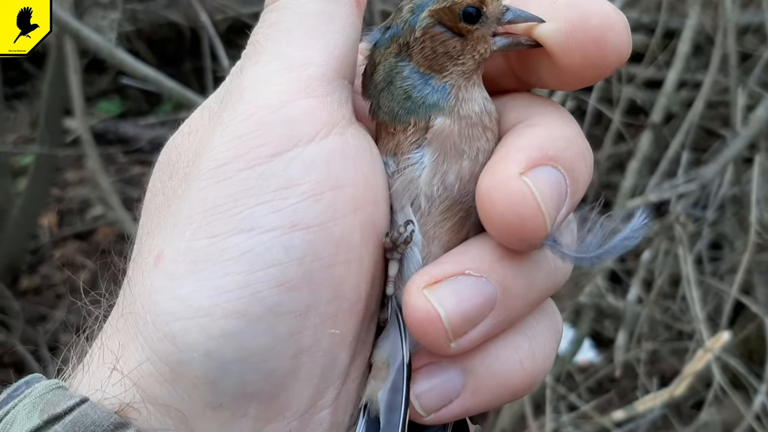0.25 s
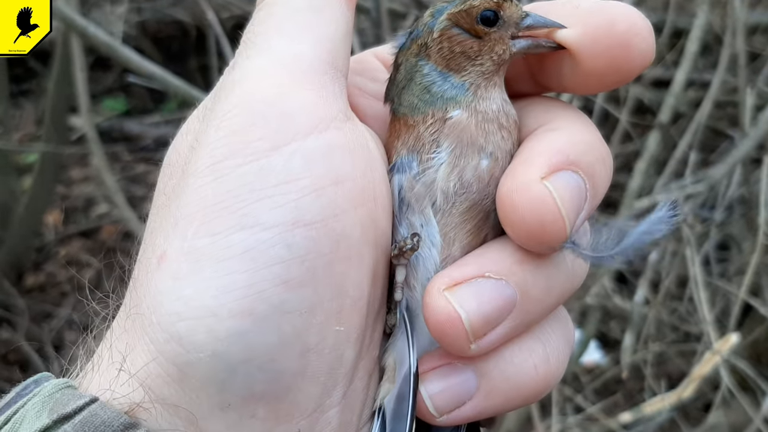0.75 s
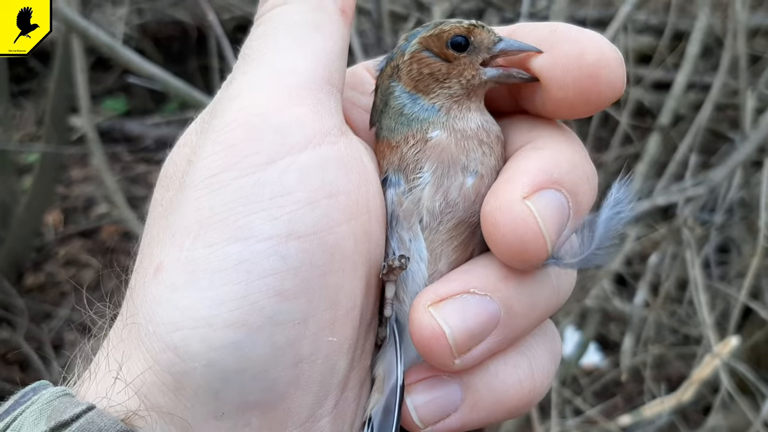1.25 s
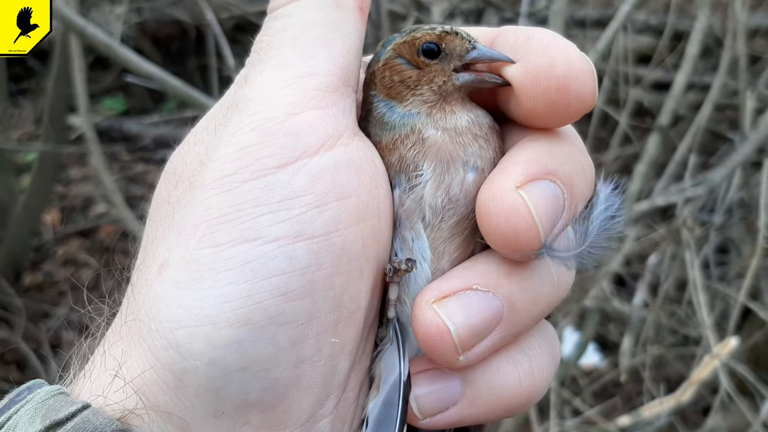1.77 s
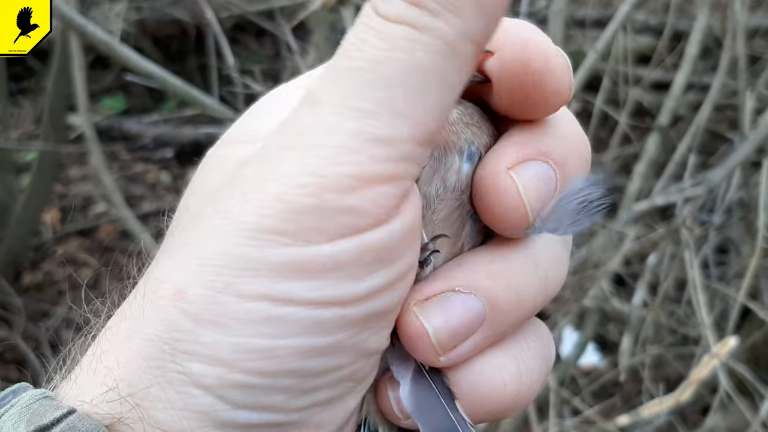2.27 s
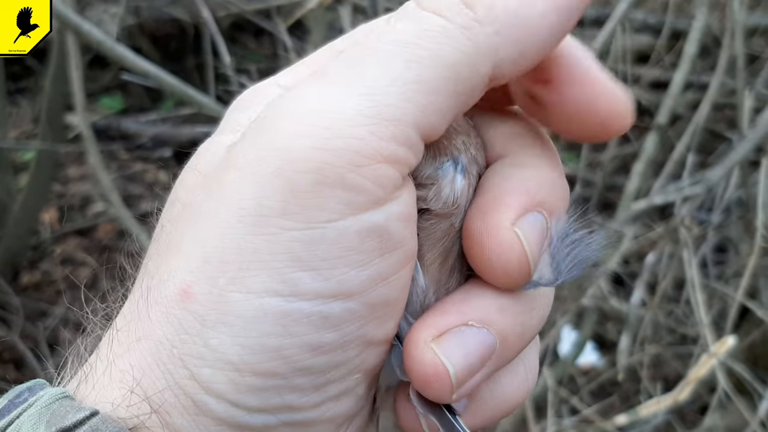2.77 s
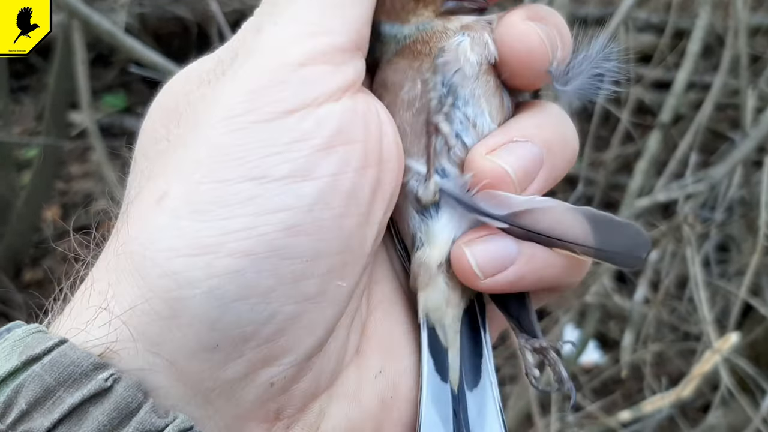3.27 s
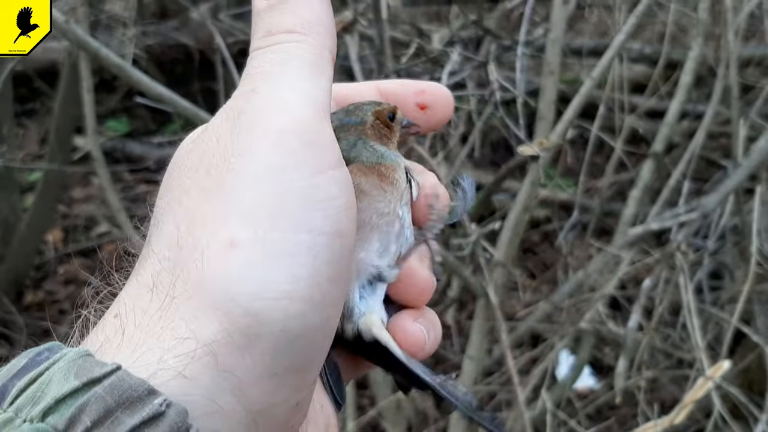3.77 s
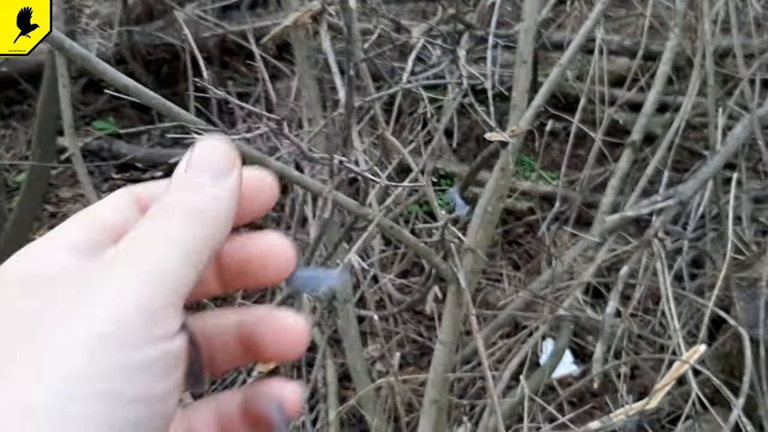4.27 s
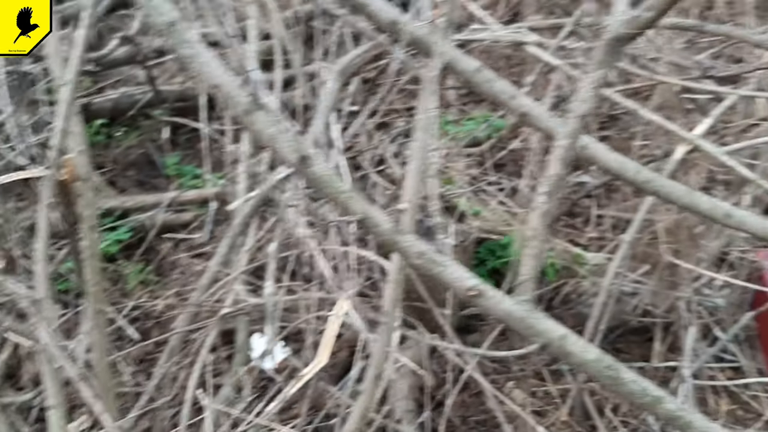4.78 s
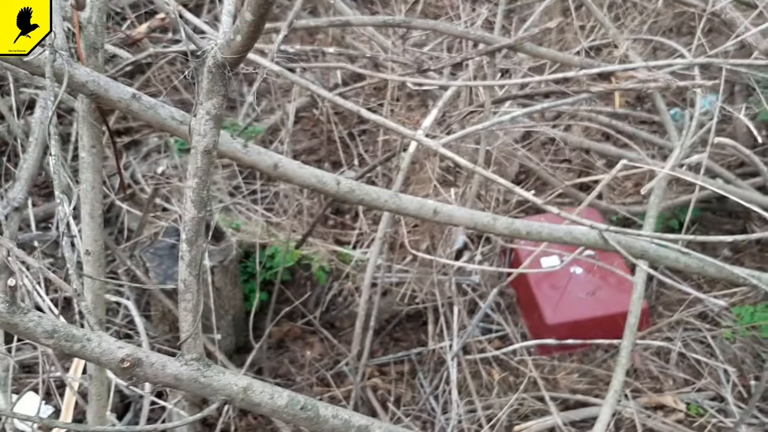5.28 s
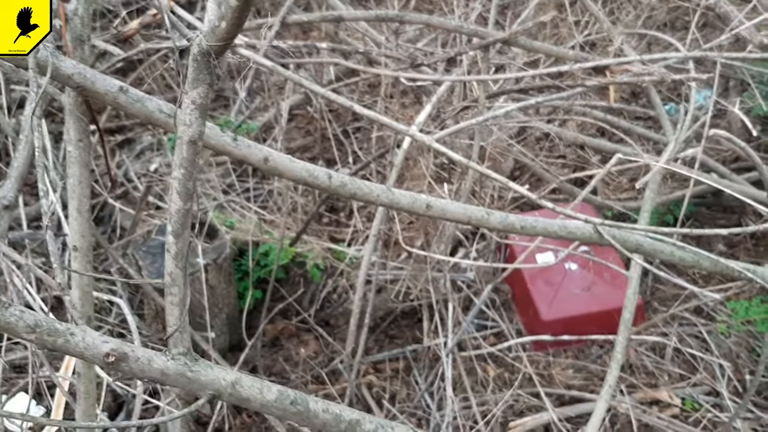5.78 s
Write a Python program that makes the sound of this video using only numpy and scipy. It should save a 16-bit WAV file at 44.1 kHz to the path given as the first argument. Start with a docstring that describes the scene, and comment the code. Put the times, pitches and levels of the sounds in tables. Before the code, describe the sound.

A quiet outdoor place among shrubs, with low rumble, a soft distant wash and faint hiss. Two tiny rasps open the scene, then from 0.6 to 1.2 s a songbird gives an even run of soft rising pips. Sparse thin slurs follow on the left, gathering near 2.0 to 2.3 s with a high falling whistle; very faint low hoots sit far behind. A short rasp comes at 2.5 s, then scattered chirps until 3.8 s. At 3.9 s feathers brush skin and a finch bursts away: a rapid soft flutter with papery snaps and low air puffs, strongest around 4.03 s, moving right and thinning by 4.4 s. Weak wingbeats linger; a dry twig click lands near 5.0 s. The song is now louder and more central: a clear arching whistle from 5.0 to 5.4 s, then quick chirps and buzzy rasps until about 5.8 s, before background air closes it.

```python
"""Finch let go among shrubs

A finch leaves a hand: noise for feathers on fingers, snaps and low air swings for wings whirring off to the right,
click-and-knock pulses for a wing tip, then twigs. A starling-like songbird warbles all along: gliding near-pure
tones for slurs and whistles, trains of tiny chirps for rasps, scattered by stems. Faint hoots are sines; rumble,
wash and hiss are coloured noise. A phone with two microphone ports, close to the hand, turns after the finch."""
import sys
import numpy as np
from scipy import signal
from scipy.fft import rfft, irfft, next_fast_len
from scipy.io import wavfile
from scipy.ndimage import uniform_filter1d, map_coordinates

SR = 44100
rng = np.random.default_rng(int(sys.argv[2]) if len(sys.argv) > 2 else 0)


def file_out(sig):
    """Save sig as 16-bit WAV at sys.argv[1]."""
    # one column per channel
    cols = np.atleast_2d(sig).T
    # limit, then scale
    lim = np.clip(cols, -1, 1)
    pcm = np.round(lim * 32767).astype(np.int16)
    wavfile.write(sys.argv[1], SR, pcm)


N = 265967
TIME = np.arange(N) / SR

# Table levels are mix levels ahead of each layer's trim; spectra give relative levels.
# wing strokes: t/s, level/dB
WING_STROKES = [(3.939, -36), (3.965, -38), (3.985, -39), (4.015, -33), (4.028, -23), (4.071, -29),
                (4.112, -34.5), (4.16, -41.5), (4.197, -30), (4.294, -34), (4.343, -32.5), (4.391, -33.5),
                (4.613, -35.5), (4.657, -38), (4.731, -35), (4.753, -37), (4.787, -39), (4.944, -38),
                (5.757, -36.5)]
# the finch's way: t/s, left over right level/dB, feather snap over push level/dB
FINCH_PATH = [(3.95, 6, -6.5), (4.1, -0.5, -11.5), (4.3, -24, -12.5), (4.75, -28.5, -28),
              (4.97, -34.5, -19.5), (5.76, -15.5, -6)]
# colour of the feather snap: f/Hz, level/dB
SNAP_COLOUR = [(60, -14.5), (250, 3.5), (600, -3.5), (1200, -14), (2500, -33), (6000, -28), (15000, -42.5)]
# colour of the wing swish: f/Hz, level/dB
SWISH_COLOUR = [(100, -11), (500, -5), (1000, 1), (1700, -2.5), (2500, -14), (6000, -19.5), (15000, -37)]
# wing tips slipping between fingers: t/s, half length/s, level/dB
WING_TIP_SLIPS = [(3.941, 0.0057, -35), (4.016, 0.0029, -47.5), (4.069, 0.0025, -40)]
# colour of feathers on skin: f/Hz, level/dB
FEATHER_COLOUR = [(300, 0), (1500, 4), (2500, 0), (4500, 8.5), (7500, 5), (11000, 4.5), (15500, -5)]
# feathers on skin swell, hold while the bird pushes out, and fade
BRUSH_FROM_S, BRUSH_TO_S, BRUSH_RISE_DB_PER_S, BRUSH_FALL_DB_PER_S = 3.917, 4.033, 200, 92
# dry ticks along its way, a wing tip click, then twigs: t/s, click level/dB, knock level/dB
DRY_TICKS = [(3.915, -31.5, -52), (4.731, -36, -42.5), (4.961, -55.5, -30), (4.9665, -48, -21.5),
             (4.98, -32.5, -28.5), (4.99, -23.5, -37.5), (5.022, -38, -57.5), (5.12, -39.5, -43.5)]
# colour of the sharp click: f/Hz, level/dB
CLICK_COLOUR = [(200, 18), (1500, 9.5), (4000, 7.5), (7500, -10), (15000, -9)]
# colour of the dull knock: f/Hz, level/dB
KNOCK_COLOUR = [(40, -18), (120, 1.5), (500, 3), (900, -6), (2000, -15.5), (6000, -45)]

# clear notes of the song: t/s, length/s ahead of soft edges, start f/Hz, end f/Hz, level/dB
CLEAR_NOTES = [(0.99, 0.02, 5960, 7600, -61.5), (1.183, 0.019, 5750, 7700, -60),
               (1.415, 0.032, 5940, 7700, -65.5), (1.464, .038, 3180, 4430, -52.5),
               (1.574, 0.029, 2850, 3486, -55), (1.696, .044, 4350, 5140, -64.5),
               (1.812, .024, 2700, 3074, -56.5), (1.922, 0.036, 2830, 4700, -58),
               (2.017, 0.034, 2780, 3480, -52.5), (2.079, 0.029, 3240, 4560, -43),
               (2.125, 0.019, 3250, 3380, -48.5), (2.171, .067, 2370, 3230, -55.5),
               (2.173, 0.042, 5600, 7000, -58), (2.205, 0.049, 3900, 4340, -43.5),
               (2.264, 0.034, 3110, 4400, -48.5), (2.306, 0.017, 4940, 4140, -46),
               (2.311, 0.038, 3320, 2310, -57), (2.565, .031, 3380, 3040, -51),
               (2.661, 0.019, 3070, 3630, -49), (2.797, 0.061, 4020, 4590, -59.5),
               (2.816, 0.1, 5400, 7470, -66), (2.853, 0.055, 3800, 4850, -51.5),
               (2.86, 0.038, 3240, 3800, -55), (2.861, 0.072, 1980, 2520, -65.5),
               (2.932, 0.023, 2610, 2780, -55), (3.011, 0.0097, 2940, 4650, -49.5),
               (3.038, 0.092, 5380, 5650, -64.5), (3.051, 0.041, 3124, 3290, -48),
               (3.115, 0.039, 7450, 6730, -56), (3.34, 0.022, 6050, 7660, -56.5),
               (3.366, 0.013, 5080, 3270, -49.5), (3.386, 0.015, 3790, 4590, -54),
               (3.421, 0.049, 5600, 5690, -58.5), (3.495, 0.037, 5240, 5350, -58.5),
               (3.518, 0.032, 3050, 3374, -47), (3.555, 0.024, 3700, 4520, -53.5),
               (3.644, 0.05, 3400, 3400, -54), (3.669, 0.051, 6700, 5310, -55.5),
               (3.718, 0.051, 3300, 2650, -49.5), (3.739, 0.0071, 3200, 4380, -40.5),
               (3.78, 0.015, 3770, 4580, -52), (3.805, 0.045, 6000, 5260, -51.5),
               (4.405, 0.028, 2980, 3380, -54.5), (4.507, .045, 3620, 4600, -42.5),
               (4.552, 0.019, 5700, 6720, -48.5), (4.669, 0.024, 6520, 5560, -51.5),
               (4.783, 0.037, 5020, 4430, -45), (4.923, 0.023, 3100, 3420, -53),
               (5.01, 0.028, 3340, 4350, -40.5), (5.062, .033, 5950, 5460, -55.5),
               (5.084, 0.027, 3560, 4320, -37.5), (5.124, 0.027, 5900, 6500, -47.5),
               (5.236, .033, 6940, 6550, -49.5), (5.374, .026, 5170, 4750, -48.5),
               (5.39, 0.056, 3635, 4320, -39), (5.458, 0.034, 3940, 3350, -43),
               (5.462, 0.029, 3950, 4120, -41), (5.507, 0.053, 2400, 2780, -48),
               (5.571, .03, 2980, 2400, -50), (5.657, 0.036, 3350, 2664, -41),
               (5.713, 0.048, 3430, 4300, -36.5), (5.729, 0.062, 3800, 4350, -38)]
# a slur moves fast at first, then levels off; the crest is its loudest point as a share of the note
NOTE_BOW, NOTE_CREST = .7, 0.38
# the song opens with an even run of soft rising pips; pitches and level are centres for chance spread
PIP_START_S, PIP_GAP_S, PIP_S, PIP_FROM_HZ, PIP_TO_HZ, PIP_DB = .62, .1035, .03, 2790, 3150, -58.5
# a pip ends in an upward flick: its length, pitch ratio and typical level relative to the pip
PIP_FLICK_S, PIP_FLICK_RISE, PIP_FLICK_DB = 0.016, 1.11, -8.5
# falling whistle, two point lists: pitch as t/s, f/Hz; level as t/s, level/dB
FALLING_WHISTLE = [(2.015, 7494), (2.033, 6696), (2.047, 6420), (2.165, 5195), (2.169, 5014),
                   (2.215, 4411)], [(2.012, -67), (2.022, -52), (2.032, -53.5), (2.134, -52.5),
                   (2.142, -55.5), (2.204, -48.5), (2.22, -58)]
# whistle leading into the long one, two point lists: pitch as t/s, f/Hz; level as t/s, level/dB
LEAD_IN_WHISTLE = [(4.74, 2250), (4.864, 2307), (4.906, 2260), (4.914, 2185), (4.925, 2100)], [(4.74, -65),
                   (4.848, -50), (4.88, -48), (4.9, -65.5), (4.922, -48), (4.935, -64.5)]
# long arching whistle, two point lists: pitch as t/s, f/Hz; level as t/s, level/dB
ARCHING_WHISTLE = [(4.998, 2410), (5.014, 2437), (5.078, 2654), (5.162, 2677), (5.25, 2545), (5.312, 2420),
                   (5.35, 2385), (5.378, 2307), (5.41, 2298)], [(4.985, -51.5), (5.003, -42.5),
                   (5.031, -34), (5.065, -34.5), (5.077, -51), (5.091, -35.5), (5.181, -34), (5.201, -48.5),
                   (5.219, -32), (5.293, -23), (5.311, -30), (5.357, -25.5), (5.373, -35.5), (5.401, -28),
                   (5.418, -56)]
# buzzy calls: t/s, length/s, pulse rate/(1/s), centre f/Hz, pitch scatter/share, level/dB
RASP_CALLS = [(.008, 0.039, 128, 2340, 0.17, -53.5), (.082, 0.074, 100, 2300, 0.13, -53.5),
              (2.521, 0.1, 920, 3770, 0.2, -56), (3.683, 0.032, 530, 5660, 0.05, -52),
              (5.43, 0.073, 600, 3990, 0.042, -42.5), (5.509, 0.068, 230, 2520, 0.096, -48.5),
              (5.642, .02, 1300, 3790, 0.22, -41.5), (5.669, 0.062, 206, 2700, 0.15, -46.5),
              (5.772, 0.059, 330, 3080, 0.23, -49)]
# sinking of the pitch over a rasp, as a log ratio; relative rise within each pulse
RASP_SAG, RASP_CHIRP_PER_S = 0.11, 35
# spans of soft slurs under the clear notes: start t/s, end t/s, slur rate/(1/s), level/dB
UNDERSONG_SPANS = [(2.027, 2.3, 41, -56), (3.496, 3.836, 60, -61), (5.02, 5.4, 40, -51.5),
                   (5.422, 5.8, 47, -58)]
# the song passes from left to right as the phone turns: t/s, left over right level/dB
SONG_PATH = [(0, 6.5), (.8, 15.5), (2.2, 7.5), (3.7, 13), (4.5, 5.5), (5, -2.5), (5.8, -5)]
PORT_LAG_S = 0.000496  # the song reaches the left port this much sooner

# faint far-off hoots: t/s, centre f/Hz
HOOT_CALLS = [(0.451, 360), (.46, 620), (1.17, 354.3), (1.93, 360.5), (2.57, 626)]
# low background: t/s, rumble level/dB, distant wash level/dB
AIR_LEVELS = [(0, -54, -59), (.55, -50, -58), (1.4, -52.5, -61.5), (2.1, -49.5, -58.5), (2.5, -54, -61),
              (3.9, -54, -59.5), (4.02, -44, -46), (4.1, -37.5, -49.5), (4.26, -50.5, -55), (4.6, -56, -56),
              (5.1, -51, -56), (6.03, -52.5, -56.5)]
# hisses: t/s, hiss level/dB, high hiss level/dB
HISS_LEVELS = [(0, -64, -76.5), (.55, -68, -83.5), (.75, -79.5, -79), (2.4, -78, -78), (2.6, -71, -73),
               (3.8, -65, -79.5), (4, -48, -74.5), (4.28, -68, -69.5), (4.39, -60.5, -60.5),
               (4.62, -56.5, -69), (4.9, -67, -74), (5.2, -64.5, -74.5), (5.38, -55.5, -65.5),
               (5.5, -56, -80), (5.8, -57.5, -83.5), (5.87, -60.5, -68), (6.03, -64, -72.5)]
# colour of the rumble: f/Hz, level/dB
RUMBLE_COLOUR = [(13, -60.5), (22, -32.5), (41, -5.5), (65, 1.5), (82, -2), (174, -15.5), (260, -24.5),
                 (340, -58), (570, -120)]
# colour of the distant wash: f/Hz, level/dB
WASH_COLOUR = [(100, -24), (180, -16), (260, -5.5), (370, -3), (450, -4), (630, -3), (900, -10),
               (1250, -15.5), (1600, -16.5), (1780, -38.5), (2400, -39.5), (4000, -90)]
# colour of the hiss: f/Hz, level/dB
HISS_COLOUR = [(900, -3), (1600, 5.5), (2200, 3.5), (3500, -3.5), (5000, -3), (7500, -15.5), (10000, -20.5)]
# colour of the high hiss: f/Hz, level/dB
HIGH_HISS_COLOUR = [(5000, -7.5), (8000, -1.5), (11000, -3), (13000, -0.5), (15800, -6.5)]
# microphone response: f/Hz, level/dB
MIC_RESPONSE = [(20, 2), (7400, -0.5), (8000, -9.5), (8500, -20), (9600, -11.5), (11000, -1.5),
                (16000, 7.5)]
TOP_HZ = 15900  # nothing passes the microphone from here up


def wings(push_hz, push_s, swish_s, push_db, snap_db, swish_db):
    """Each stroke swishes, snaps the flight feathers taut and sends a short low swing of air."""
    air, swishes = np.zeros((2, N)), np.zeros((2, N))
    t = np.arange(SR // 8) / SR
    centred = t - t.mean()
    slap = impulse(SNAP_COLOUR, size=len(t) // 2 * 2 + 2)[:len(t)]
    chances = rng.standard_normal((len(WING_STROKES), 2))
    for (s, db), (pace, stiffness) in zip(WING_STROKES, chances):
        side, feather_db = finch_at(s)
        spread = 0.006 * (1 - np.exp(-t / 0.0025))  # the swing slows as it spreads
        cycles = push_hz * np.exp(0.16 * pace) * (t + spread)
        swell = t / push_s * np.exp(1 - t / push_s)
        swing = np.sin(2 * np.pi * cycles) * swell
        quill_hz = 1600 * np.exp(.06 * stiffness)
        quill = 2.8 * np.sin(2 * np.pi * quill_hz * t) * np.exp(-t / .0011)
        snap = quill + amp(snap_db) * slap
        add(air, s, side * amp(db) * (amp(feather_db) * snap - amp(push_db) * swing))
        swish = amp(db + feather_db + swish_db) * np.exp(-np.abs(centred) / swish_s)
        add(swishes, s - t.mean(), side * swish)
    return air + swishes * noise(SWISH_COLOUR, alike=0.99)


def finch_at(s):
    """Left-right gains and feather snap (dB) of the finch at time s."""
    times, side_db, snap_db = np.transpose(FINCH_PATH)
    return panned(np.interp(s, times, side_db)), np.interp(s, times, snap_db)


def feathers(level_db, grain_db):
    """Barbs scrape unevenly over skin as the bird pushes out of the hand."""
    rise_db = BRUSH_RISE_DB_PER_S * np.maximum(BRUSH_FROM_S - TIME, 0)
    fall_db = BRUSH_FALL_DB_PER_S * np.maximum(TIME - BRUSH_TO_S, 0)
    grain = unit(amp(grain_db * wobble(450)))
    rub = amp(level_db - rise_db - fall_db) * grain
    slips = sum(amp(db) * np.exp(-((TIME - s) / width) ** 2) for s, width, db in WING_TIP_SLIPS)
    return (rub + slips) * panned(side_db=15.5) * noise(FEATHER_COLOUR, alike=0.17)


def dry_ticks(click_db, knock_db):
    """Dry ticks: a sharp click on a dull knock that hardly rings."""
    out = np.zeros((2, N))
    click, knock = impulse(CLICK_COLOUR), impulse(KNOCK_COLOUR)
    for s, sharp_db, dull_db in DRY_TICKS:
        side, _ = finch_at(s)
        tick = amp(sharp_db + click_db) * click + amp(dull_db + knock_db) * knock
        add(out, s, side * tick)
    return out


def song():
    """The songbird in the shrubs: it reaches the left port first, near stems blur it, far trees answer faintly."""
    chatter = warble(level_db=-1.0, pip_spread=0.0316, pip_uneven_db=2.5, flick_uneven_db=2.5)
    chatter = chatter + rasps(pulse_s=.0016, uneven_db=2.0, ends_db=-6)
    chatter = chatter + whistle(FALLING_WHISTLE, level_db=5, waver=0.0046)
    chatter = chatter + undersong(pitch_hz=3755, spread=.4, glide=0.077, length_s=.035)
    chatter = panned(curves(SONG_PATH)[0]) * chatter
    lead_in = whistle(LEAD_IN_WHISTLE, level_db=0.5, waver=0.0017)
    arch = whistle(ARCHING_WHISTLE, level_db=2.0, waver=0.0011)
    held = panned(side_db=-5.5) * (lead_in + arch)
    near = chatter + held + thicket(chatter, t60=0.13, wet_db=-4.5, shared=0.71)
    # half the lag forward on the left, half back on the right
    ported = filtered(near, lambda hz: np.exp(np.outer([1, -1], 1j * np.pi * hz * PORT_LAG_S)))
    return ported + thicket(chatter + held, t60=0.34, wet_db=-10.0, shared=0.47)


def warble(level_db, pip_spread, pip_uneven_db, flick_uneven_db, count=6):
    """The run of pips, each with its own pitch, slope and strength of flick, then the clear notes."""
    out, pips = np.zeros((1, N)), []
    for k, (low, high, strength, flick) in enumerate(rng.uniform(-0.89, 1, (count, 4))):
        s = PIP_START_S + k * PIP_GAP_S
        start_hz = PIP_FROM_HZ * np.exp(2 * pip_spread * low)
        top_hz = PIP_TO_HZ * np.exp(pip_spread * high)
        db = PIP_DB + pip_uneven_db * strength
        flick_db = db + PIP_FLICK_DB + flick_uneven_db * flick
        pips.append((s, PIP_S, start_hz, top_hz, db))
        pips.append((s + PIP_S, PIP_FLICK_S, top_hz, top_hz * PIP_FLICK_RISE, flick_db))
    for s, length, start_hz, end_hz, db in pips + CLEAR_NOTES:
        note = slur(length, start_hz, end_hz)
        add(out, s + (length - len(note) / SR) / 2, amp(db + level_db) * note)
    return out


def slur(length, start_hz, end_hz, edge=.27):
    """One note: it glides from pitch to pitch along a bow, swelling and fading past both ends."""
    u = np.arange(-edge, 1 + edge, 1 / (length * SR))  # 0 to 1 over the note proper
    pitch_hz = start_hz + (end_hz - start_hz) * (u + NOTE_BOW * u * (1 - u))
    crest = np.clip(NOTE_CREST, .1, .9)
    swell = np.sin(np.interp(u, [-edge, crest, 1 + edge], [0, np.pi / 2, np.pi])) ** 2
    return swell * syrinx(pitch_hz, overtone_db=-19.5, waver=0.013, shimmer_db=4.0)


def syrinx(pitch_hz, overtone_db, waver, shimmer_db):
    """A nearly pure tone of rms about 1: pitch and strength tremble, with a faint skirt of turbulence."""
    size = len(pitch_hz)
    phase = 2 * np.pi * np.cumsum(pitch_hz * (1 + waver * wobble(350, size))) / SR
    overtone_fade = 1 / (1 + (pitch_hz / 3500) ** 20)  # overtones above about 7 kHz are faint
    overtone = amp(overtone_db) * np.sin(2 * phase) * overtone_fade
    turbulence = 7 * waver * wobble(1800, size)
    shimmer = amp(shimmer_db * wobble(160, size))
    return np.sqrt(2) * (np.sin(phase + turbulence) + overtone) * shimmer


def whistle(shape, level_db, waver):
    """One long held or slurred tone."""
    pitch, level = shape
    sounding = (TIME > level[0][0]) & (TIME < level[-1][0])
    gate = uniform_filter1d(1. * sounding, size=200)  # softens the on and off
    tone = syrinx(curves(pitch)[0], overtone_db=-50.5, waver=waver, shimmer_db=1.14)
    return gate * amp(curves(level)[0] + level_db) * tone


def rasps(pulse_s, uneven_db, ends_db):
    """A rasp is a swelling train of tiny chirps; both sides of the syrinx sound, each at a chance pitch."""
    out, t = np.zeros((1, N)), np.arange(512) / SR
    centred = t - t.mean()
    bell = np.exp(-(centred / pulse_s) ** 2)
    for s, length, rate, pitch_hz, scatter, db in RASP_CALLS:
        onsets = np.arange(0, length, 1 / rate)
        for onset, (late, strength, *detune) in zip(onsets, rng.standard_normal((256, 4))):
            early = .5 - onset / length
            hz = pitch_hz * np.exp(RASP_SAG * early + scatter * np.array(detune)[:, None])
            cycles = hz * centred * (1 + RASP_CHIRP_PER_S * centred)
            chirp = np.sin(2 * np.pi * cycles).sum(0) * bell
            pulse_db = db + uneven_db * strength + ends_db * (2 * early) ** 2
            size = amp(pulse_db) / np.sqrt(rate * pulse_s)  # dense trains get smaller pulses
            add(out, s + onset + .0005 * late - t.mean(), size * chirp)
    return out


def undersong(pitch_hz, spread, glide, length_s):
    """Soft short slurs at chance pitches run evenly through spans of the song."""
    out = np.zeros((1, N))
    for start, end, rate, db in UNDERSONG_SPANS:
        onsets = np.arange(start, end, 1 / rate)
        for s, (height, slope, span, strength) in zip(onsets, rng.uniform(-1, 1, (60, 4))):
            u = np.linspace(-1, 1, int(length_s * SR * 2 ** (span / 2)))
            hz = pitch_hz * np.exp(spread * height + glide * slope * u)
            tone = syrinx(hz, overtone_db=-8.5, waver=0.011, shimmer_db=3.0)
            level = amp(db + 2 * strength - 2 * height)  # higher slurs are softer
            add(out, s, level * np.cos(np.pi * u / 2) * tone)
    return out


def thicket(x, t60, wet_db, shared, count=12):
    """Stems and ground scatter the song into a decaying noise tail, redrawn and crossfaded over time."""
    t, out = np.arange(SR // 2) / SR, np.zeros((2, N))
    decay = amp(-60 * t / t60) * (1 - np.exp(-t / 0.0032))
    hop = N // count + 1
    for start in range(-hop, N, hop):
        left, right, both = rng.standard_normal((3, len(t))) * decay
        tail = np.array([left, right]) + shared * both
        tail /= np.linalg.norm(tail, axis=1, keepdims=True)
        span = np.arange(max(start, 0), min(start + 2 * hop, N))
        piece = x[:, span] * np.sin(np.pi * (span - start) / (2 * hop)) ** 2
        add(out, span[0] / SR, signal.fftconvolve(piece, tail, axes=1))
    return amp(wet_db) * out


def hoots(level_db, length_s, waver):
    """Soft low calls: sines of trembling pitch that swell and fade."""
    out, size = np.zeros((2, N)), int(length_s * SR)
    swell = np.sin(np.linspace(0, np.pi, size))
    for s, pitch_hz in HOOT_CALLS:
        phase = 2 * np.pi * np.cumsum(pitch_hz * (1 + waver * wobble(57.0, size))) / SR
        add(out, s, amp(level_db) * swell * np.sin(phase))
    return out


def outdoors():
    """Low rumble, a distant wash and two faint hisses, all coloured noise of drifting level."""
    rumble_db, wash_db = curves(AIR_LEVELS)
    hiss_db, high_db = curves(HISS_LEVELS)
    rumble = amp(rumble_db + 2.5 + 0.79 * wobble(9)) * noise(RUMBLE_COLOUR, alike=0.68)
    wash = amp(wash_db + 1.5 + 0.22 * wobble(3.81)) * noise(WASH_COLOUR, alike=0.22)
    hiss = amp(hiss_db) * noise(HISS_COLOUR, alike=0.071) * panned(side_db=1.0)
    high_hiss = amp(high_db) * noise(HIGH_HISS_COLOUR, alike=0.081)
    return rumble + wash + hiss + high_hiss


def amp(db):
    """Decibels to gain."""
    return 10 ** (np.asarray(db) / 20)


def unit(x):
    """Scale to rms 1."""
    return x / np.sqrt(np.mean(x ** 2) + 1e-20)


def gains(points, hz):
    """Gain of (Hz, dB) points read on a log axis."""
    f, db = np.transpose(points)
    return amp(np.interp(np.log(hz + 1), np.log(f + 1), db))


def curves(rows):
    """One value per sample for each column after the time."""
    s, *cols = np.transpose(rows)
    return [np.interp(TIME, s, c) for c in cols]


def wobble(rate, size=N):
    """A smooth random curve, rate knots a second."""
    knots = rng.standard_normal(int(size * rate / SR) + 4)
    return map_coordinates(knots, [np.arange(size) * rate / SR])


def filtered(x, response):
    """x shaped by a response of frequency."""
    m = next_fast_len(N + 8192)
    return irfft(rfft(x, m) * response(np.fft.rfftfreq(m, 1 / SR)), m)[..., :N]


def noise(spectrum, alike):
    """Coloured stereo noise of rms 1; alike is the correlation of the two ports."""
    a, b = filtered(rng.standard_normal((2, N)), lambda hz: gains(spectrum, hz))
    turn = np.arccos(np.clip(alike, -1, 1)) / 2
    return unit(np.cos(turn) * a + np.sin(turn) * np.array([b, -b]))


def impulse(spectrum, size=2048):
    """Causal pulse of a given colour, peak 1."""
    cepstrum = irfft(np.log(gains(spectrum, np.fft.rfftfreq(size, 1 / SR))))
    cepstrum[1:size // 2] *= 2  # folding gives minimum phase
    cepstrum[size // 2 + 1:] = 0
    pulse = irfft(np.exp(rfft(cepstrum)))
    return pulse / np.abs(pulse).max()


def panned(side_db):
    """Left and right gains of constant power, for a fixed or a moving source."""
    pair = amp(np.outer([.5, -.5], side_db))
    return pair / np.sqrt(np.mean(pair ** 2, axis=0))


def add(track, s, sound):
    """Mix a sound into a track at time s."""
    start = max(round(s * SR), 0)
    part = track[:, start:start + sound.shape[-1]]
    part += sound[..., :part.shape[1]]


def scene():
    """Release, wingbeats and song over the outdoor background."""
    flight = wings(push_hz=86, push_s=.007, swish_s=.006, push_db=1.5, snap_db=3, swish_db=-8)
    flight = flight + feathers(level_db=-46.0, grain_db=5.0)
    ticks = dry_ticks(click_db=6.5, knock_db=2)
    far_calls = hoots(level_db=-57.5, length_s=0.13, waver=0.022)
    return flight + ticks + song() + far_calls + outdoors()


def record(dry):
    """The microphone has a dip near 8.5 kHz and a steep band limit."""
    return filtered(dry, lambda hz: gains(MIC_RESPONSE, hz) * (hz < TOP_HZ))


dry = scene()
out = record(dry)
file_out(out)
```